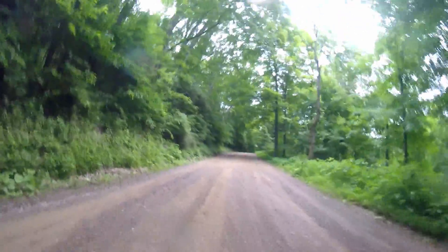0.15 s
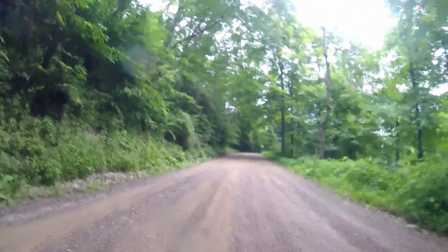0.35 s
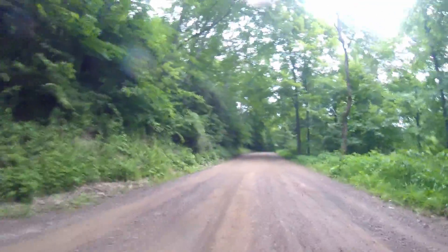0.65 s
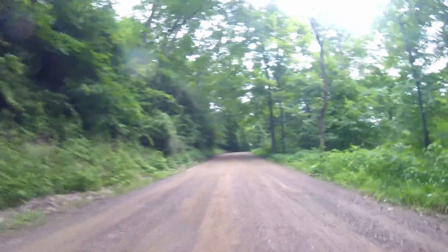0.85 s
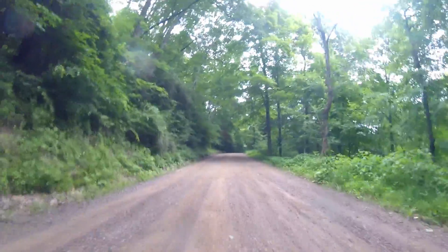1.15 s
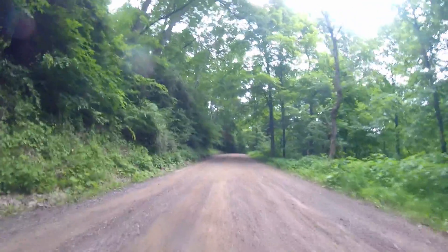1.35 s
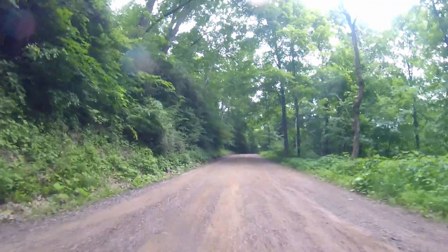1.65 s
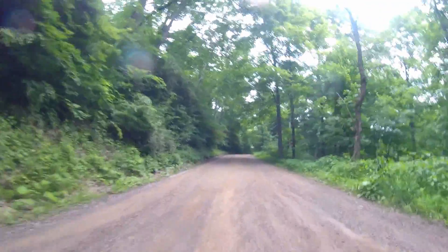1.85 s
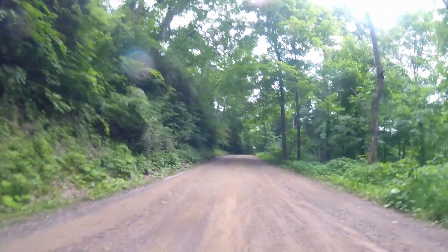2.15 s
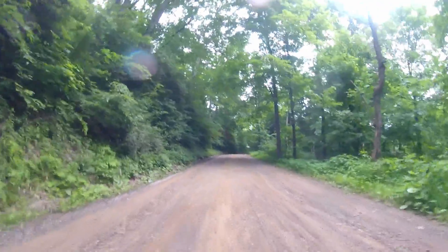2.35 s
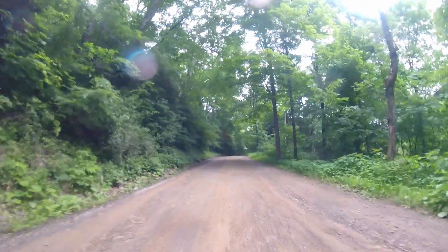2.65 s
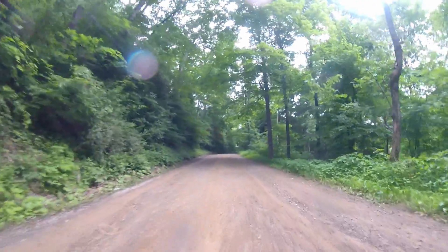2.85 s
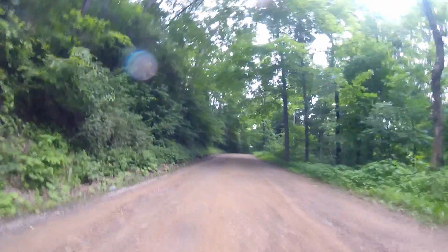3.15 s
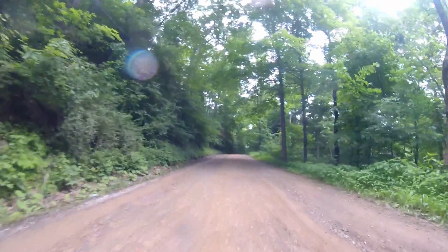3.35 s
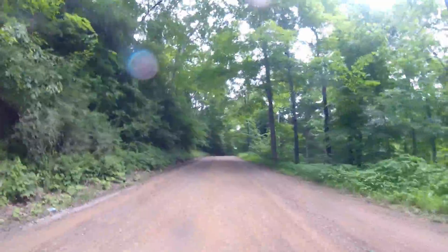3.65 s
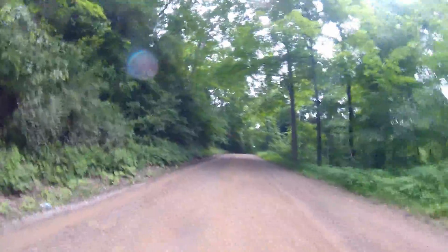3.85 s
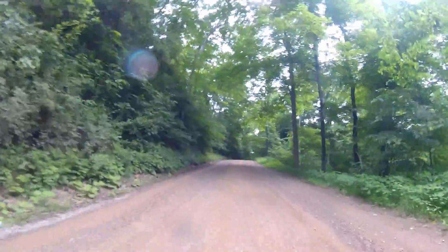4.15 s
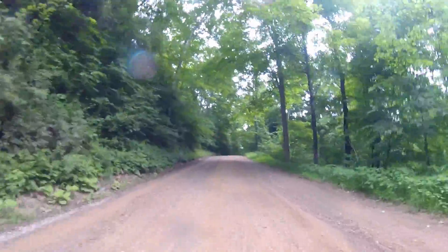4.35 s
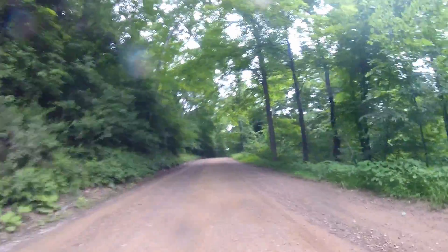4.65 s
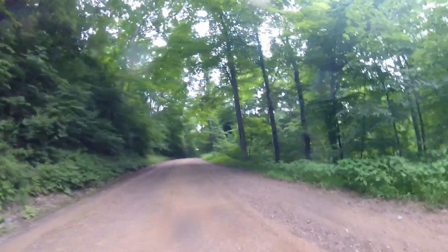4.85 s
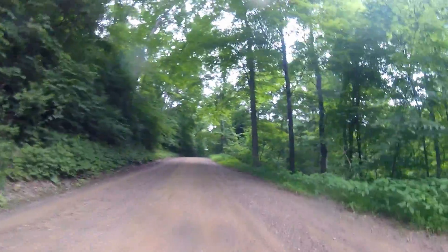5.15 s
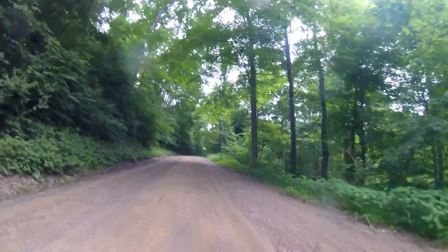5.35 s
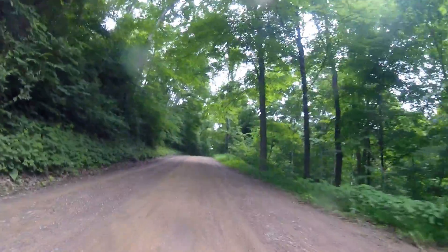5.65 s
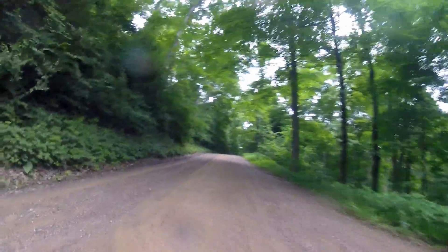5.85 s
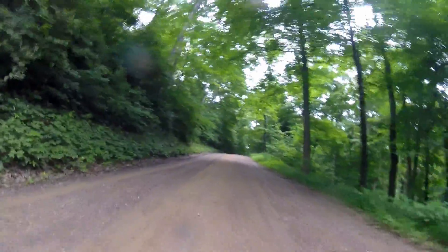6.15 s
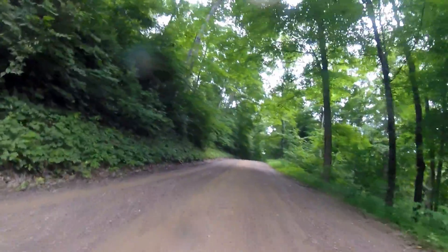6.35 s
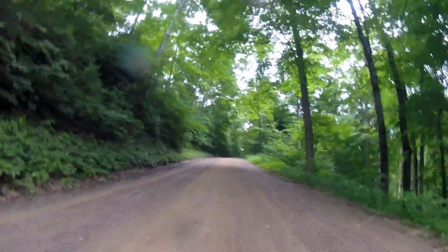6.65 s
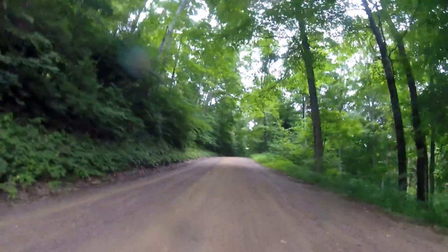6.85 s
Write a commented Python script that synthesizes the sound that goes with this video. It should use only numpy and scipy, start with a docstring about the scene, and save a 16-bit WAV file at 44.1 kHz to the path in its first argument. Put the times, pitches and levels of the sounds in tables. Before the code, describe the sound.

Close, boxy onboard sound of a bike on an unpaved forest road: continuous low frame shake and tyre drumming, with thin gritty crackle on top. Two dry clicks lead into a hard thump and a cluster of hollow clacks early on. Later come another heavy bump, lighter knocks, brief gravel crunches, scattered bright stone ticks and repeated low wind buffets. The rolling never stops.

```python
"""Bicycle on a gravel road

A bicycle rolls along rough gravel; the microphone sits in a hollow case mounted on its frame.
Filtered noise sways the frame and mount; random grains drum under the tyres and crackle as grit.
Bumps ring the mount in decaying sines, gravel crunches, flung stones tick on the bicycle, dry clicks
snap close by and wind gusts on the case. Twice the rolling sound drops with a snap just before
one of the hardest bumps, then sags and recovers."""
import sys
import numpy as np
from scipy import signal
from scipy.fft import rfft, irfft
from scipy.io import wavfile
from scipy.ndimage import uniform_filter1d

SR = 44100
rng = np.random.default_rng(int(sys.argv[2]) if len(sys.argv) > 2 else 0)


def waveform_to_disk(signal):
    """Save audio, clipped to [-1, 1], as 16-bit WAV at the path in sys.argv[1]."""
    frames = np.transpose(np.atleast_2d(signal))
    scaled = np.clip(frames, -1, 1) * 32767
    samples = np.round(scaled).astype(np.int16)
    wavfile.write(sys.argv[1], SR, samples)


N = 309141  # length [samples]

# Relative levels are drives or shapes that the functions scale further.
# road under the wheels, against an ordinary stretch: (time [s], unevenness [dB], gravel cover [dB])
ROAD = [(0.0, -1, -0.5), (0.45, -0.5, 0.5), (0.7, 0, -1), (1.4, 1.5, 2.5), (2.0, -3, -0.5), (2.4, -1, -0.5),
        (2.8, -0.5, -2), (3.3, 3, 0), (3.8, 0.5, 0), (4.2, -2.5, -1), (4.55, -1.5, -0.5), (4.9, 0.5, 1),
        (5.8, -0.5, 0.5), (6.35, 1, 1.5), (6.75, 0.5, 1.5), (7.01, -1, 1)]
# passing changes of the rolling sound, such as hollow drumming after bumps:
# (time [s], fade length [s], drumming change [dB], grit change [dB])
ROLLING_CHANGES = [(0.648, 0.25, 6.5, 2.5), (0.955, 0.28, 9, -7), (1.19, 0.47, 10.5, -8),
                   (1.84, 0.24, -3.5, -0.5), (2.68, 0.12, 9, 7), (4.843, 0.13, 2, -1),
                   (5.226, 0.23, -1, 0.5), (5.825, 0.17, -1, 4.5), (5.906, 0.23, 9, 8)]
# swaying of frame and mount: (frequency [Hz], nominal width [Hz], relative level [dB])
FRAME_MODES = [(52.4, 7.2, 1.5), (66.6, 5.15, 0.5), (100.9, 6.15, -1.5), (110.3, 12.3, 1),
               (123.6, 28, -9.5), (144.4, 14, -1.5), (154.8, 13.4, -5.5), (174.1, 7, -10.5)]
# ripples in the road: (time [s], level [dB], nominal pitch [Hz])
RIPPLES = [(0.619, -14, 108), (0.748, -18, 108.3), (1.97, -18.5, 106.7), (2.309, -14, 64.7),
           (2.46, -17.5, 110.1), (3.75, -22.5, 139.1), (4.931, -12.5, 65.1), (5.51, -10.5, 63.4),
           (5.99, -16, 143.7), (6.9, -14.5, 103.9)]
# hollow resonances of the case: (frequency [Hz], width [Hz], relative level [dB])
CASE_MODES = [(1100, 73, -8), (1225, 230, 1), (2590, 130, -18.5), (4730, 77, -15.5), (5000, 72, -19),
              (6230, 80, -16), (9400, 75, -19.5), (11750, 150, -42)]
# bumps that knock the mount: (time [s], relative thump [dB], relative body [dB], relative clack [dB],
# body pitch [Hz], crack level [dB], crack pitch [Hz])
KNOCKS = [(0.362, -18, -29, -54, 606, -29.5, 700), (0.8525, -9.5, -25, -47, 456, -20, 600),
          (0.873, -25, -31, -54, 420, -48, 700), (0.9475, -28, -22, -48, 590, -23, 715),
          (0.957, -27, -25, -54, 394, -38, 500), (1.042, -32, -31.5, -55, 500, -33, 1140),
          (1.169, -16, -15.5, -31, 654, -10, 700), (1.1723, -22.5, -38, -48, 706, -21, 1075),
          (1.179, -21.5, -14, -57, 370, -32, 395), (1.203, -33, -28, -44.5, 700, -35, 760),
          (1.226, -40, -26, -56, 610, -34, 700), (1.272, -27.5, -22.5, -53.5, 600, -31, 1240),
          (1.812, -32, -36, -54, 560, -41, 1000), (2.055, -44, -39, -48.5, 430, -41, 1200),
          (2.076, -44, -32.5, -44, 437, -41, 1100), (2.649, -18.5, -18.5, -59, 380, -25, 482),
          (2.651, -32, -29, -63, 420, -33, 1500), (2.7365, -17, -30, -71, 383, -22, 292),
          (2.781, -21.5, -30.5, -67, 397, -44, 700), (2.959, -10.5, -23.5, -46.5, 470, -41, 980),
          (3.133, -41, -43, -70, 566, -44, 1100), (4.035, -37, -35.5, -53, 446, -33, 595),
          (4.458, -25.5, -32, -51, 607, -25.5, 700), (4.777, -45, -33.5, -61, 600, -41, 720),
          (4.839, -22, -24, -55, 690, -36, 700), (4.857, -33, -37, -48, 450, -27, 600),
          (4.872, -37, -28, -44, 437, -33, 1400), (5.128, -36, -37, -49, 393, -28, 500),
          (5.253, -19, -21, -42.5, 570, -31, 660), (5.424, -44, -28.5, -46.5, 544, -30.5, 870),
          (5.879, -31, -31, -56, 560, -32, 640), (5.928, -21.5, -25, -53, 580, -22.5, 685),
          (6.033, -36, -30, -51, 644, -34, 680), (6.073, -32, -50, -43.5, 560, -38, 646),
          (6.207, -38, -27.5, -54, 640, -30, 710), (6.874, -28.5, -26.5, -46, 500, -24, 690),
          (6.982, -50, -44, -54, 600, -33, 760)]
# ringing of knocked mount and case: (nominal frequency [Hz], relative level [dB], 60 dB decay [s])
MOUNT_MODES = [(118, -1.5, 0.11), (161, -6.5, 0.21), (198, -12.5, 0.19), (269, -10, 0.058),
               (383, 5.5, 0.069), (439, -4, 0.12), (500.4, -9.5, 0.17), (570, 0, 0.027), (605, -12, 0.15),
               (675, 1.5, 0.068), (722, -5, 0.067), (1020, -3.5, 0.025), (1224, 5.5, .05),
               (1490, -8.5, 0.089), (1980, -7.5, 0.069)]
# gravel crushed or squeezed out from under a tyre:
# (time [s], level [dB], lowest [Hz], highest [Hz], hold [s], 60 dB decay after the hold [s])
CRUNCHES = [(0.205, -49.5, 1450, 6340, 0.007, 0.068), (0.217, -51, 4100, 5300, 0.017, 0.041),
            (0.848, -40.5, 1400, 2290, 0.0033, 0.025), (0.85, -40, 3500, 7700, 0.0022, 0.021),
            (0.864, -53, 3600, 6330, .005, 0.02), (1.166, -38, 900, 2200, 0.0054, 0.029),
            (1.268, -46, 1100, 2380, 0.0045, 0.029), (1.788, -50.5, 855, 2360, 0.004, 0.03),
            (2.425, -58, 4300, 6900, 0.037, 0.05), (2.958, -36.5, 1400, 7700, 0.0017, 0.011),
            (4.29, -43, 820, 2200, .002, 0.03), (4.853, -49, 900, 2700, 0.041, 0.071),
            (4.869, -32.5, 1180, 2800, .007, 0.018), (4.865, -53.5, 3800, 4140, 0.016, 0.023),
            (5.421, -48, 900, 2440, .007, 0.016), (5.855, -48.5, 1500, 4200, .025, 0.2),
            (5.938, -34.5, 1230, 3540, 0.0056, 0.074), (5.943, -51.5, 3450, 7150, 0.0076, 0.04),
            (6.336, -45, 900, 2310, .012, 0.059)]
# larger stones ticking on the bicycle: (time [s], relative level [dB], pitch [Hz])
STONES = [(0.054, -22.5, 2620), (0.215, -23, 2580), (0.227, -29, 5000), (1.4225, -24.5, 3220),
          (1.433, -30, 4770), (1.494, -23.5, 4600), (1.586, -27.5, 2400), (1.812, -35, 2000),
          (1.893, -31, 5000), (1.902, -43, 2600), (1.908, -32.5, 4700), (1.985, -35, 5000),
          (1.997, -38, 4900), (2.012, -45, 3400), (2.026, -50, 4700), (2.12, -32, 3400), (2.132, -36, 2800),
          (2.237, -41, 4700), (2.341, -33, 3000), (2.39, -41, 3100), (2.6805, -33, 3000),
          (2.763, -32.5, 3200), (3.848, -27, 3700), (3.928, -20.5, 4630), (3.364, -34, 3600),
          (4.113, -24.5, 2620), (4.355, -29, 3400), (4.608, -23.5, 3350), (4.653, -29, 2100),
          (5.022, -29, 4800), (5.152, -40, 3600), (5.253, -28, 3600), (5.402, -30.5, 3200),
          (5.559, -33, 4850), (5.632, -23.5, 4600), (5.879, -19.5, 2730), (5.942, -23.5, 2500),
          (5.949, -32, 4700), (5.958, -18.5, 3400), (6.001, -25, 2700), (6.045, -34, 2520),
          (6.073, -30, 2400), (6.128, -27, 3000), (6.138, -30, 3400), (6.315, -25, 2900),
          (6.481, -34, 5000), (6.542, -21, 2800)]
# sharp, dry clicks close to the microphone: (time [s], relative level [dB])
CLICKS = [(0.655, -15.5), (0.7026, -16)]
# drops of the rolling level before the hardest bumps:
# (start time [s], end time [s], depth [dB], snap peak [dB])
DIPS = [(0.7973, 0.848, -7.5, -14), (2.909, 2.962, -10, -16)]
# wind gusts on the case: (time [s], rise [dB])
GUSTS = [(0.29, 9), (1.82, 8.5), (2.602, 8.5), (3.281, 8.5), (3.981, 10.5), (4.501, 7), (4.982, 8.5),
         (5.519, 7.5), (6.75, 3)]
# colours of tyre drumming, grit, stone ticks, dry clicks, a knock's rattle, the snap at a drop,
# and wind buffeting: (frequency [Hz], relative level [dB])
TYRE_COLOUR = [(120, -8.5), (208, -22), (235, -1.5), (280, 0), (318, -15), (362, 0), (398, 11), (445, 0),
               (555, -7), (665, -1.5), (740, -7.5), (850, -23.5), (1250, -24.5), (1700, -44.5)]
GRIT_COLOUR = [(500, -1.5), (1000, -3), (1500, 3.5), (2150, -2.5), (2500, 4), (3400, -0.5), (4250, -5),
               (4700, 2), (5150, 0), (5950, -10), (6520, 1.5), (7300, -8.5), (9400, -16), (12500, -43.5)]
TICK_COLOUR = [(600, 19.5), (1500, 0), (3000, 0), (4200, -3.5), (5000, 4.5), (5900, -19.5), (6550, -1),
               (8000, -20.5), (10000, -33.5), (14000, -43.5)]
CLICK_COLOUR = [(700, -18), (1100, -18), (1450, 11.5), (2600, 0.5), (3600, -8), (4700, 6), (7000, -8),
                (10000, -14), (14000, -33)]
RATTLE_COLOUR = [(300, -12.5), (700, 10.5), (1000, 0), (1500, -7.5), (2000, -5), (3000, -15), (6500, -18),
                 (12000, -49)]
DROP_COLOUR = [(200, 21), (600, 7.5), (1500, -1), (5000, -12), (9000, -18.5), (14000, -37)]
BUFFET_COLOUR = [(10, -13.5), (23, -4.5), (27, -6), (33, 3), (40, -18), (80, -36.5), (200, -34.5),
                 (600, -59.5)]
# pitches of the fine chips: (pitch [Hz])
CHIP_PITCHES_HZ = (1400, 2200, 3000, 3600, 4900)

# base level on ordinary road (dB), and how strongly each sound follows the road (dB per dB)
SHAKE_DB, SHAKE_FOLLOWS = -19.97, 1.08
DRUM_DB, DRUM_FOLLOWS = -36.5, 1.8
GRIT_DB, GRIT_FOLLOWS = -66.5, 2  # reference for the crackle, its ringing and the chips
CHANGE_ONSET_S = 0.012
SWAY_LUMPS_DB, GRIT_SURGE_DB = 1.0, 1.0  # random swings; the sway is evened out afterwards
# random swings of the drumming before it is evened out: level, upper part, and pitch (share)
DRUM_LUMPS_DB, DRUM_BRIGHT_SWING_DB, DRUM_WANDER = 1.9, 1.6, 0.035
DRUM_BRIGHT_HZ = 500  # split between lower and upper part
RIPPLE_S, RIPPLE_WANDER = 0.026, 0.04075  # Gaussian spread (s); share by which the pitch wanders
# fine chips: mean rate before flurries vary it, typical peak over the grit reference, spread
CHIPS_PER_S, CHIP_OVER_GRIT_DB, CHIP_SPREAD_DB = 48, 17.5, 2.7
# lighter bumps on ordinary road: rate, relative (thump, body, clack), central pitch
BUMPS_PER_S, LIGHT_BUMP_DB, LIGHT_BUMP_HZ = 1.5, (-40, -41, -55), 538.5
BUMP_SPREAD_DB = 2.5
CRACK_CYCLES = 14.6  # cycles in which a crack falls by 60 dB
CRUNCH_RISE_S = 0.002
# sag after each drop; WIND_SAG is the wind's share of its depth in dB
SAG_DB, SAG_HOLD_S, SAG_RECOVER_S, WIND_SAG = -8.5, 0.51, 0.7, 0.78
WIND_DB, GUST_S = -27, 0.15  # level between gusts; time from a gust's top to 1/e of its rise in dB
CUTOFF_HZ = 15000


def from_db(db):
    """Decibels to gain."""
    return 10 ** (np.asarray(db) / 20)


def rms_one(x):
    """Scale to unit power."""
    return x / np.sqrt(np.mean(x ** 2) + 1e-20)


def in_time(rows):
    """Interpolate each table column to one value per sample."""
    s, *columns = np.transpose(rows)
    return [np.interp(np.arange(N) / SR, s, c) for c in columns]


def add(out, s, sound):
    """Mix a short sound in at time s."""
    at = int(np.clip(round(s * SR), 0, N - 1))
    out[at:at + len(sound)] += sound[:N - at]


def drift(rate):
    """Smooth random curve of about unit rms, turning faster at a higher rate."""
    step = 40  # samples between drawn points
    r = np.exp(-2 * step * np.pi * rate / SR)
    noise = rng.standard_normal(N // step + 2002)
    slow = signal.lfilter([1], [1, -2 * r, r * r], noise)[2000:]  # drop the run-in
    return np.interp(np.arange(N) / step, np.arange(len(slow)), rms_one(slow))


def resonate(x, hz, width_hz):
    """One resonance with gain about 1 on top."""
    r = np.exp(-np.pi * width_hz / SR)
    feedback = [1, -2 * r * np.cos(2 * np.pi * hz / SR), r * r]
    return signal.lfilter(np.array([1, 0, -1]) * (1 - r * r) / 2, feedback, x)


def colour(x, spectrum, size=8192):
    """Causal (minimum-phase) filter with the given spectrum: it rings only after a blow."""
    hz, db = np.transpose(spectrum)
    grid = np.maximum(np.arange(size // 2 + 1) * SR / size, 1)
    gain = from_db(np.interp(np.log(grid), np.log(hz), db))
    cepstrum = irfft(np.log(gain))
    # fold the cepstrum onto positive time
    cepstrum[1:size // 2] *= 2
    cepstrum[size // 2 + 1:] = 0
    response = irfft(np.exp(rfft(cepstrum)))
    return signal.fftconvolve(x, response)[:len(x)]


def low_pass(x, hz, order=2):
    """Take the top off."""
    return signal.sosfilt(signal.butter(order, min(hz, SR / 2 - 1), fs=SR, output="sos"), x)


def even_out(x, seconds):
    """Divide by the short-term rms, to hold the power near 1."""
    power = uniform_filter1d(x * x, max(int(seconds * SR), 1))
    return x / np.sqrt(np.maximum(power, 1e-20))


def grains(per_s, spread_db, largest):
    """Random contacts, many small and a few large; rms 1."""
    heights_db = spread_db * np.minimum(rng.exponential(1, N), largest)
    sizes = from_db(heights_db) * rng.choice([-1, 1], N)
    return rms_one(sizes * (rng.random(N) < per_s / SR))


def burst(t60, scuff_db, size=2048):
    """One hard contact followed by a dying scuff."""
    decay = from_db(-60 * np.arange(size) / SR / t60)
    scuff = from_db(scuff_db) * rng.standard_normal(size) * decay
    scuff[0] += 1
    return scuff


def frame(shake_db):
    """Road roughness sways the frame and mount at their low resonances, in lumps."""
    sway = np.zeros(N)
    for hz, width, db in FRAME_MODES:
        narrow = resonate(rng.standard_normal(N), hz, 2.63 * width)
        sway += from_db(db) * rms_one(resonate(narrow, hz, 0.97 * width))
    lumpy = sway * from_db(SWAY_LUMPS_DB * drift(11))
    return from_db(shake_db) * even_out(lumpy, seconds=0.24)


def ripples():
    """Each run of ripples pumps one resonance into a nearly pure sway that swells and dies."""
    t = np.arange(N) / SR
    wandering_t = np.cumsum(1 + RIPPLE_WANDER * drift(7.2)) / SR
    out = np.zeros(N)
    for s, db, hz in RIPPLES:
        swell = np.exp(-((t - s) / RIPPLE_S) ** 2 / 2)
        out += from_db(db) * swell * np.sin(2 * np.pi * hz * wandering_t)
    return out


def tyres(drum_db):
    """Pebbles under the tread drum through the frame into the case, in lumps of varying tone and pitch."""
    pebbles = grains(per_s=900, spread_db=3.0, largest=6.95) * from_db(DRUM_LUMPS_DB * drift(12))
    soft = low_pass(pebbles, DRUM_BRIGHT_HZ, order=1)
    force = soft + (pebbles - soft) * from_db(DRUM_BRIGHT_SWING_DB * drift(6))
    drumming = low_pass(colour(force, TYRE_COLOUR), hz=2200)
    # reading at a varying speed bends the pitch
    read_at = np.cumsum(1 + DRUM_WANDER * drift(4)) % N
    wandering = np.interp(read_at, np.arange(N), drumming)
    return from_db(drum_db) * even_out(wandering, seconds=0.23)


def rolling_changes():
    """Changes of drumming and grit level (dB), up or down, that set in fast and fade slowly."""
    total = np.zeros((2, N))
    for s, length, drum_db, grit_db in ROLLING_CHANGES:
        full = s + CHANGE_ONSET_S
        total += np.array(in_time([(s, 0, 0), (full, drum_db, grit_db), (full + length, 0, 0)]))
    return total


def grit(crunch_db):
    """Fine grit crackles in clumps and rings the case; coarser chips click at various pitches."""
    clumps = from_db(2.3 * drift(22))
    crackle = grains(per_s=1100, spread_db=3.0, largest=3.5) * clumps
    crackle = crackle + 0.3 * rng.standard_normal(N)
    ringing = case_rings(crackle)
    contacts = grains(per_s=260, spread_db=4.0, largest=3.8) * clumps
    pitches = np.geomspace(900, 7000, 14)
    dealt = rng.integers(0, len(pitches), N)
    chips = np.zeros(N)
    for k, hz in enumerate(pitches):
        own = contacts * (dealt == k) + 1e-18  # tiny offset keeps the filter from stalling
        chips += resonate(own, hz, 0.094 * hz) / np.sqrt(hz)
    fine = from_db(6.0) * rms_one(colour(crackle, GRIT_COLOUR))
    coarse = from_db(-8.0) * rms_one(colour(chips, GRIT_COLOUR))
    return from_db(crunch_db) * (fine + ringing + coarse)


def case_rings(x):
    """The hollow case rings to a crackle, each resonance at its own level."""
    return sum(from_db(db) * rms_one(resonate(x, hz, width)) for hz, width, db in CASE_MODES)


def spat_chips(grit_db):
    """The tread spits chips in short flurries; each ticks sharply at one of a few pitches."""
    flurries = from_db(4 * drift(14))
    spread = CHIP_SPREAD_DB * np.clip(rng.standard_normal(N), -2, 2)
    sizes = from_db(grit_db + CHIP_OVER_GRIT_DB + spread)
    contact = signal.unit_impulse(512)
    ticks = []
    for hz in CHIP_PITCHES_HZ:
        ticks.append(colour(contact + 4 * resonate(contact, hz, width_hz=450), GRIT_COLOUR))
    dealt = rng.integers(0, len(ticks), N)
    out = np.zeros(N)
    for at in np.flatnonzero(rng.random(N) < CHIPS_PER_S * flurries / SR):
        tick = ticks[dealt[at]]
        add(out, at / SR, sizes[at] * tick / np.abs(tick).max())
    return out


def knocks(bumps):
    """Each bump cracks, rattles and rings the mount; low modes swell slowest, body modes favour its pitch."""
    out, t = np.zeros(N), np.arange(SR // 3) / SR
    chance = rng.standard_normal((len(bumps), len(MOUNT_MODES), 2))
    envelopes = [(1 - np.exp(-t * hz / 0.83)) * from_db(-60 * t / t60) for hz, _, t60 in MOUNT_MODES]
    for (s, thump_db, body_db, clack_db, pitch_hz, crack_db, crack_hz), draws in zip(bumps, chance):
        crack = from_db(crack_db - 60 * t * crack_hz / CRACK_CYCLES)
        add(out, s, crack * np.sin(2 * np.pi * crack_hz * t))
        for k, ((hz, db, _), (size, detune)) in enumerate(zip(MOUNT_MODES, draws)):
            if hz < 300:
                force_db = thump_db + 7.5
            elif hz < 850:
                force_db = body_db + 3.0 - 13 * abs(np.log2(hz / pitch_hz))
            else:
                force_db = clack_db + 1.0
            phase = k * np.pi * (np.sqrt(5) - 1)  # scatters the starting phases
            ring = np.sin(2 * np.pi * hz * (1 + 0.047 * detune) * t + phase)
            add(out, s, from_db(force_db + db + 1.0 * size) * envelopes[k] * ring)
        dying = from_db(-60 * t / 0.07) + from_db(-16.5) * from_db(-60 * t / 0.48)
        rattle = rms_one(colour(rng.standard_normal(len(t)), RATTLE_COLOUR))
        add(out, s, from_db(clack_db - 0.5) * rattle * dying)
    return out


def chance_hits(per_s, ride_db):
    """Random moments, denser on a harder ride: rows (s, ride dB, normal draw, uniform draw)."""
    draws = zip(rng.standard_normal(200), rng.random(200))
    hits = np.flatnonzero(rng.random(N) < per_s * from_db(ride_db) / SR)
    return [(at / SR, ride_db[at], size, share) for at, (size, share) in zip(hits, draws)]


def light_bumps(ride_db):
    """Random slight knocks, all much alike, as rows for knocks(); crack setting equals body setting."""
    rows = []
    for s, db, size, share in chance_hits(BUMPS_PER_S, ride_db):
        thump_db, body_db, clack_db = np.array(LIGHT_BUMP_DB) + db + BUMP_SPREAD_DB * size
        hz = LIGHT_BUMP_HZ * 2 ** (0.65 * (share - 0.5))
        rows.append((s, thump_db, body_db, clack_db, hz, body_db, hz))
    return rows


def crunches():
    """Tiny fractures ring the case, hold briefly and die away in a band set by the stones' size."""
    out, t = np.zeros(N), np.arange(SR // 5) / SR
    for s, db, low_hz, high_hz, hold, t60 in CRUNCHES:
        fractures = rng.standard_normal(len(t)) * (1 + 3 * (rng.random(len(t)) < 2000 / SR))
        ringing = sum(1.5 * resonate(fractures, hz, width) for hz, width, _ in CASE_MODES)
        edges = [low_hz, max(high_hz, 1.05 * low_hz)]
        band_filter = signal.butter(6, edges, "band", fs=SR, output="sos")
        band = signal.sosfilt(band_filter, fractures + ringing)
        rise = np.minimum(t / CRUNCH_RISE_S, 1)
        decay = from_db(db - 60 * np.maximum(t - hold, 0) / t60)
        add(out, s, even_out(band, seconds=0.011) * rise * decay)
    return out


def stones(flung):
    """A flung stone ticks with a pitch of its own, coloured by the case."""
    out = np.zeros(N)
    for s, db, hz in flung:
        contact = burst(t60=0.012, scuff_db=-11)
        tick = colour(contact + 1.2 * resonate(contact, hz, width_hz=900), TICK_COLOUR)
        add(out, s, from_db(db + 11.0) * tick / np.linalg.norm(tick))  # level sets the energy
    return out


def clicks():
    """Very short, bright snaps, and a fuller one at the start of each level drop."""
    out = np.zeros(N)
    for s, db in CLICKS:
        snap = colour(burst(t60=0.018, scuff_db=-22.0), CLICK_COLOUR)
        add(out, s, from_db(db - 2.0) * snap / np.abs(snap).max())
    for s, _, _, snap_db in DIPS:
        snap = colour(signal.unit_impulse(1024), DROP_COLOUR)
        add(out, s, from_db(snap_db) * snap / np.abs(snap).max())
    return out


def dips():
    """Gain that falls within a few milliseconds, holds, and comes back in a ramp of dB."""
    t = np.arange(N) / SR
    total_db = np.zeros(N)
    for start, end, depth_db, _ in DIPS:
        fall = np.clip((t - start) / 0.0063, 0, 1)
        total_db += depth_db * fall * np.clip((end - t) / 0.013, 0, 1)
    return from_db(total_db)


def sag():
    """The level sinks as each drop ends, holds and creeps back; in dB."""
    total_db = np.zeros(N)
    for _, s, _, _ in DIPS:
        held = s + SAG_HOLD_S
        curve = [(s - 0.012, 0), (s, SAG_DB), (held, SAG_DB), (held + SAG_RECOVER_S, 0)]
        total_db += in_time(curve)[0]
    return total_db


def wind(buffet_db):
    """Lumpy wind pressure on the case, which rocks on its mount: coloured low noise."""
    eddies = low_pass(colour(rng.standard_normal(N), BUFFET_COLOUR, size=32768), hz=500)
    return from_db(buffet_db) * even_out(eddies, seconds=0.17)


def gusts():
    """Each gust swells and falls away in a bell shape; in dB."""
    t = np.arange(N) / SR
    return sum(rise_db * np.exp(-((t - s) / GUST_S) ** 2) for s, rise_db in GUSTS)


def scene():
    """Rolling sound and wind follow road, gusts and drops; knocks, crunches and ticks lie on top."""
    uneven_db, gravel_db = in_time(ROAD)
    sag_db = sag()
    drum_change_db, grit_change_db = rolling_changes()
    grit_db = GRIT_DB + GRIT_FOLLOWS * gravel_db + grit_change_db + sag_db
    grit_db = grit_db + GRIT_SURGE_DB * drift(4.5)
    rolling = frame(SHAKE_DB + SHAKE_FOLLOWS * uneven_db + sag_db) + ripples()
    rolling += tyres(DRUM_DB + DRUM_FOLLOWS * gravel_db + drum_change_db + sag_db)
    rolling += grit(grit_db) + spat_chips(grit_db)
    rolling += wind(WIND_DB + gusts() + WIND_SAG * sag_db)
    bumps = list(KNOCKS) + light_bumps(uneven_db + sag_db)
    hits = knocks(bumps) + crunches() + stones(STONES) + clicks()
    return (rolling * dips() + hits)[None]


def record(dry):
    """Tall peaks are rounded off below a ceiling; the top is cut steeply."""
    ceiling = 0.68
    rounded = dry / (1 + (dry / ceiling) ** 6) ** (1 / 6)
    return signal.sosfilt(signal.cheby2(12, 70, CUTOFF_HZ, fs=SR, output="sos"), rounded)


dry = scene()
out = record(dry)
waveform_to_disk(out)
```